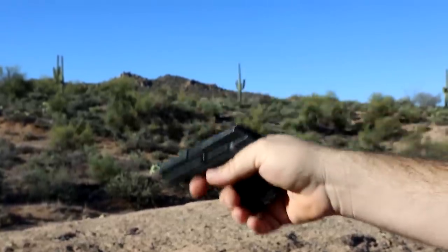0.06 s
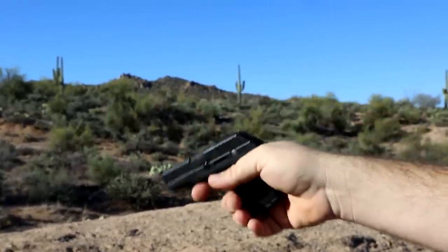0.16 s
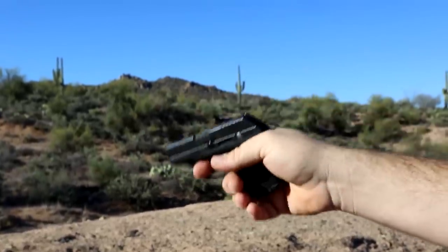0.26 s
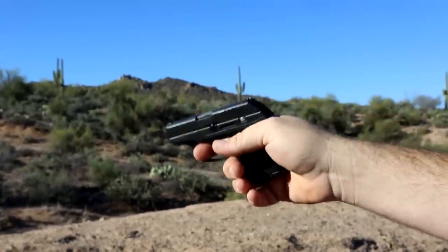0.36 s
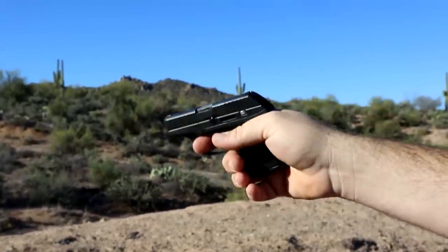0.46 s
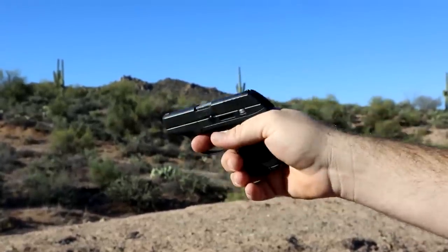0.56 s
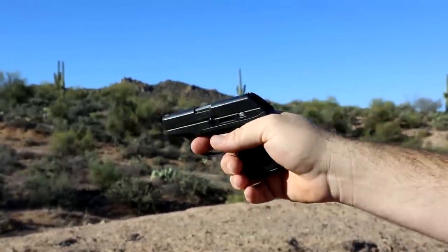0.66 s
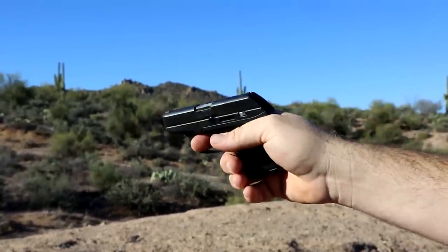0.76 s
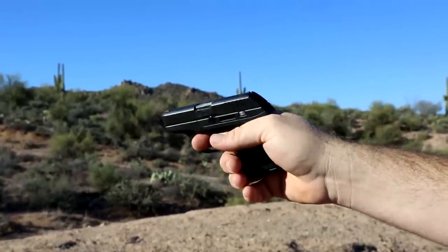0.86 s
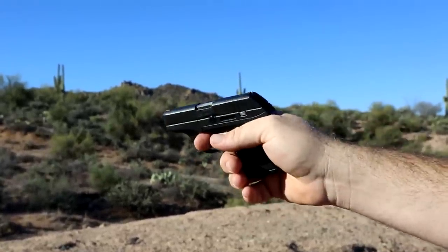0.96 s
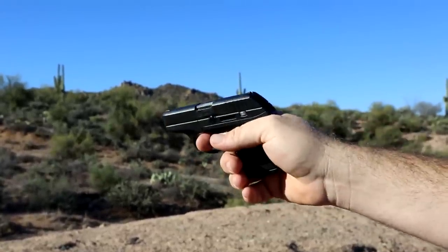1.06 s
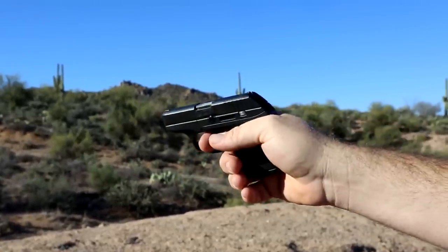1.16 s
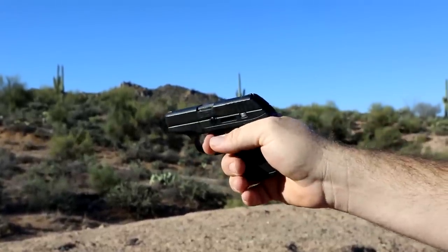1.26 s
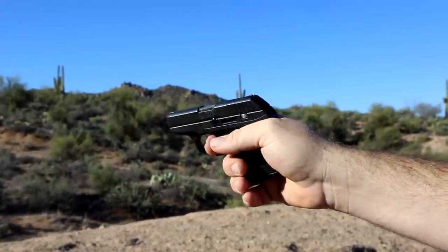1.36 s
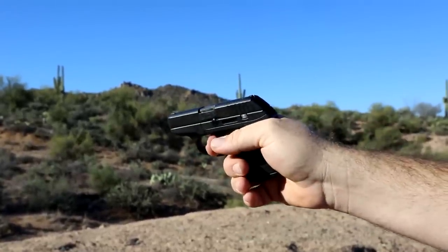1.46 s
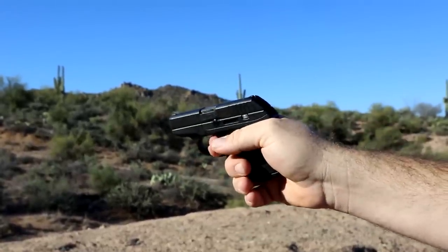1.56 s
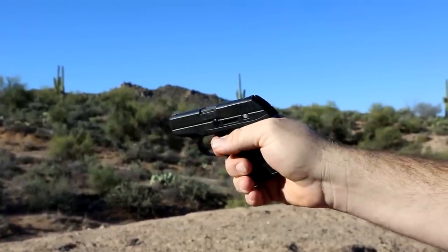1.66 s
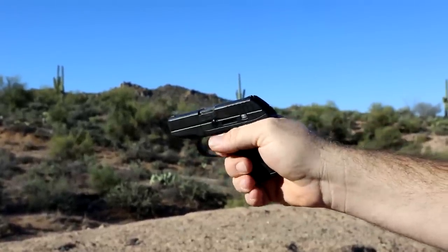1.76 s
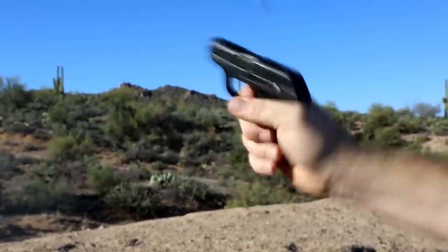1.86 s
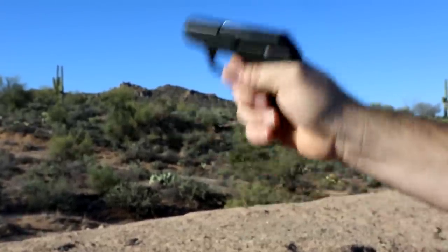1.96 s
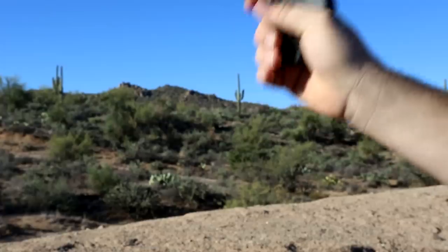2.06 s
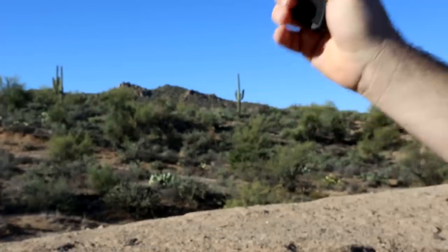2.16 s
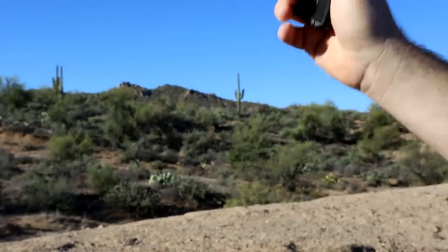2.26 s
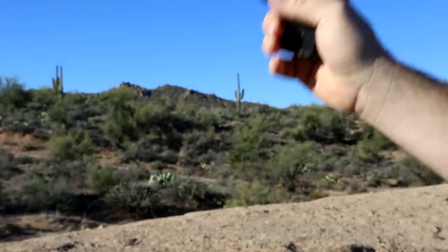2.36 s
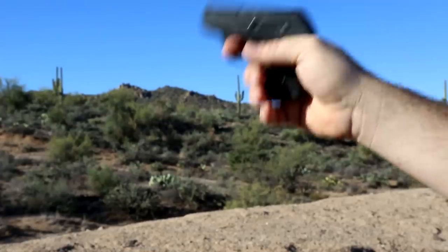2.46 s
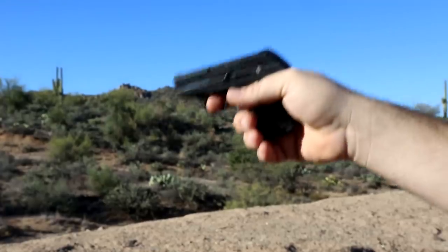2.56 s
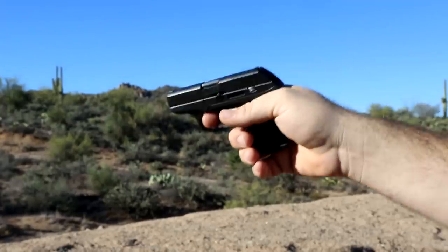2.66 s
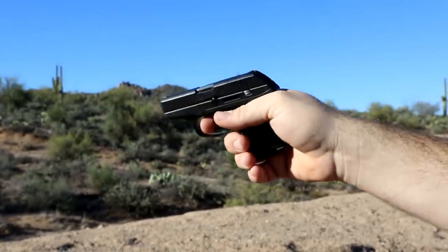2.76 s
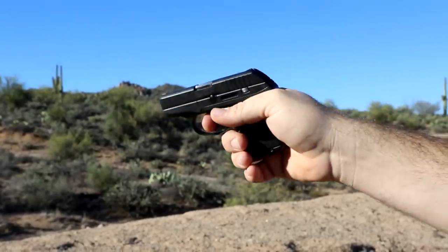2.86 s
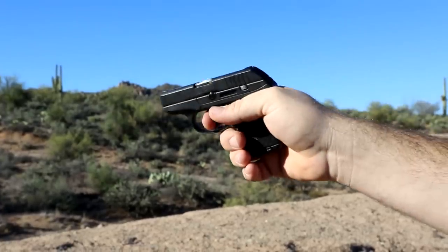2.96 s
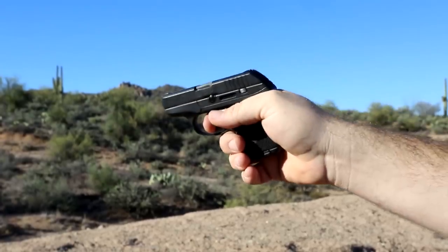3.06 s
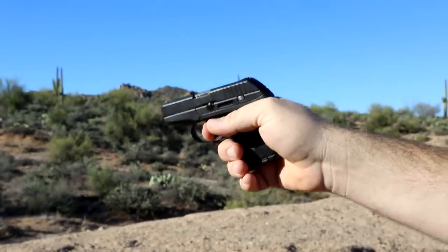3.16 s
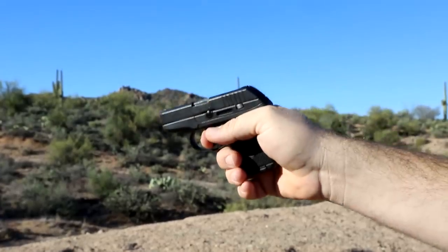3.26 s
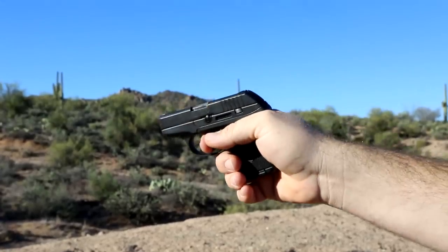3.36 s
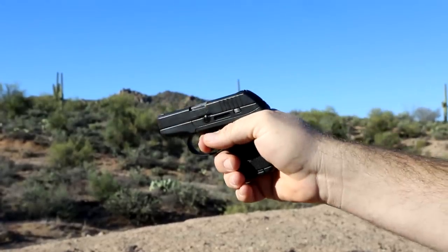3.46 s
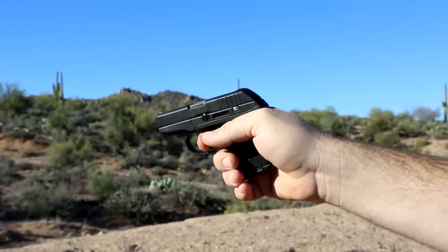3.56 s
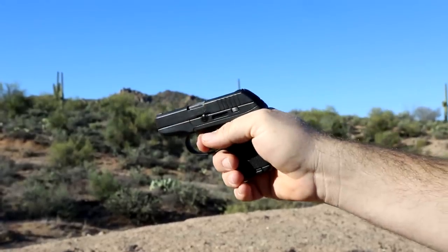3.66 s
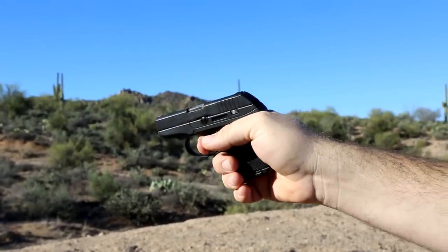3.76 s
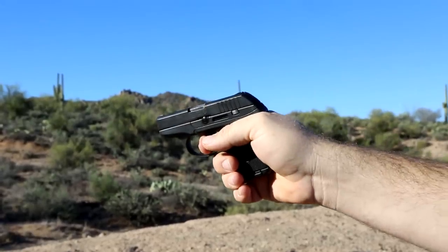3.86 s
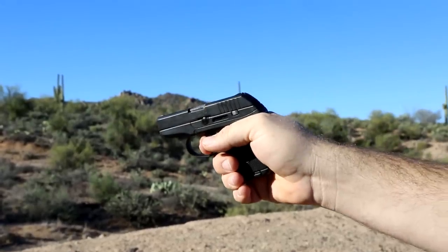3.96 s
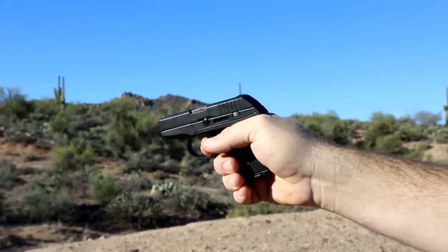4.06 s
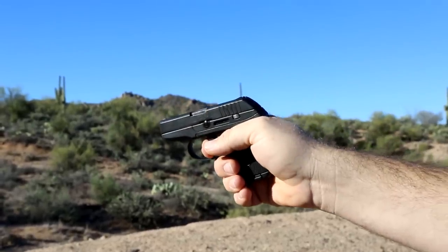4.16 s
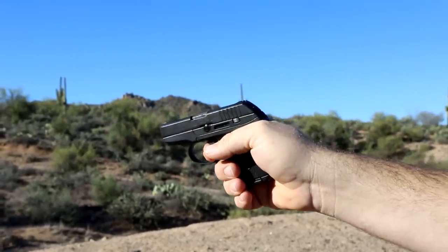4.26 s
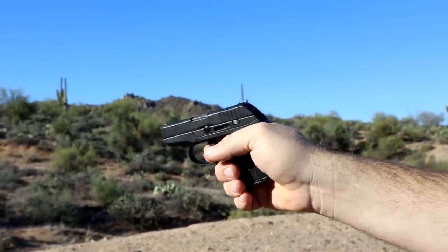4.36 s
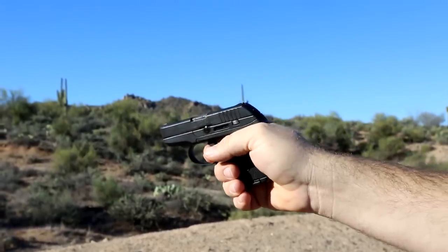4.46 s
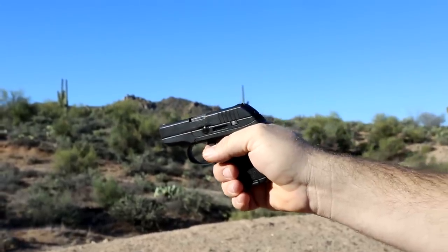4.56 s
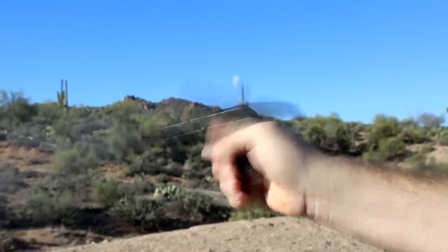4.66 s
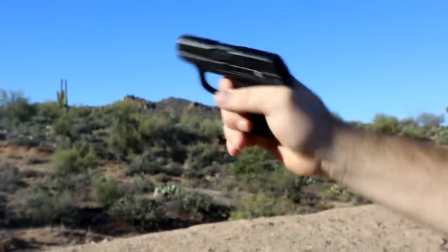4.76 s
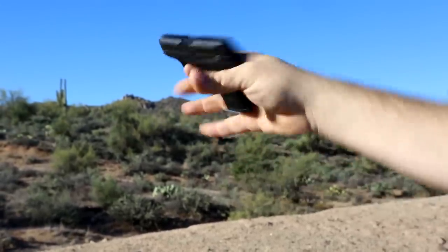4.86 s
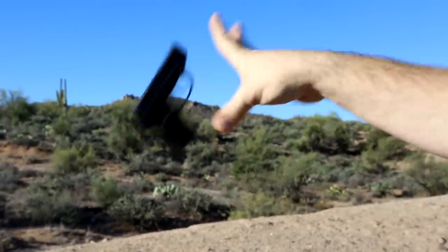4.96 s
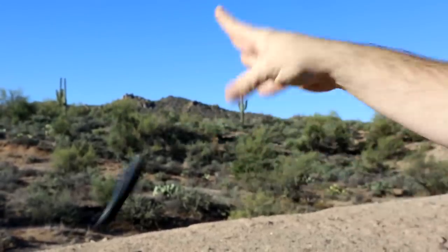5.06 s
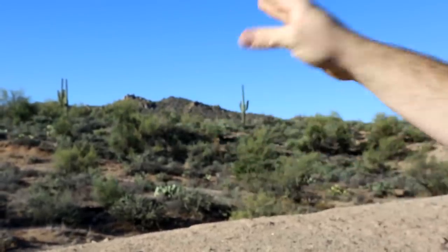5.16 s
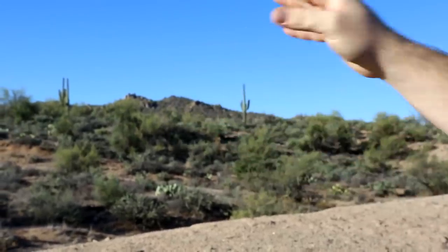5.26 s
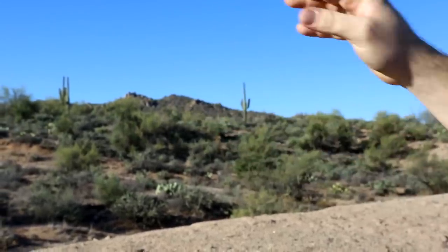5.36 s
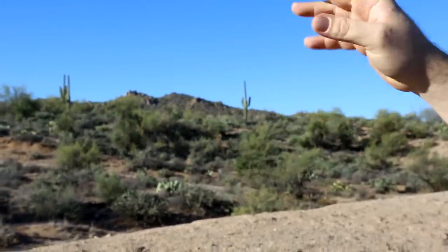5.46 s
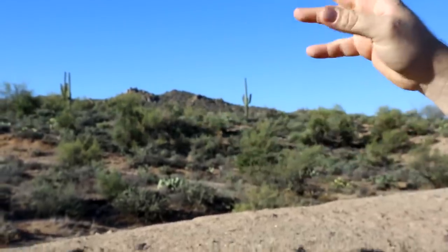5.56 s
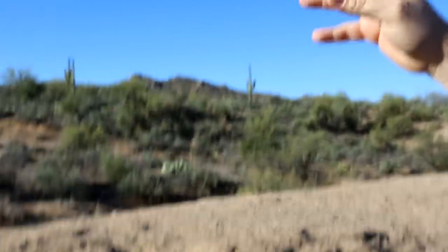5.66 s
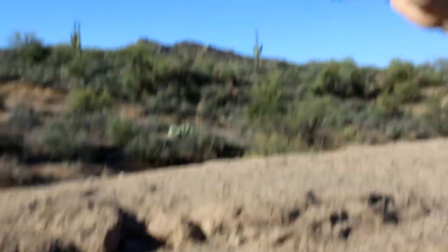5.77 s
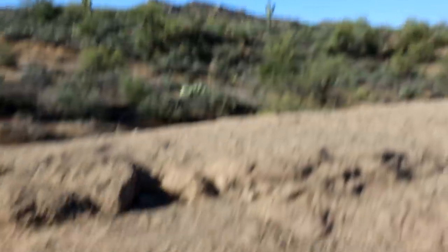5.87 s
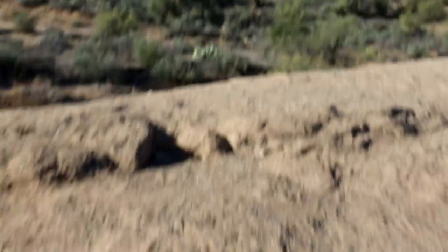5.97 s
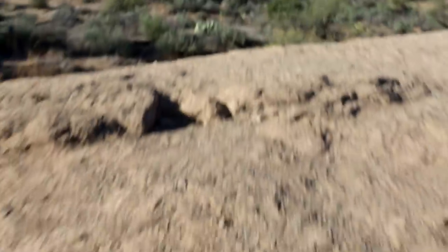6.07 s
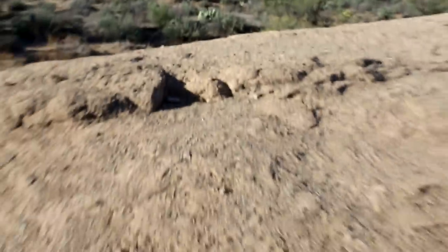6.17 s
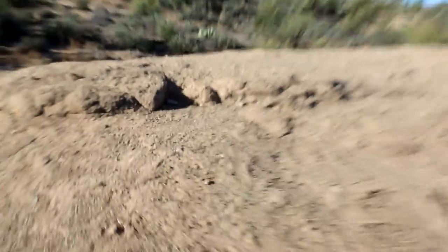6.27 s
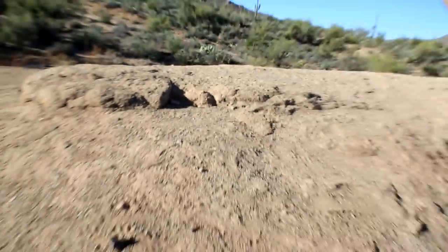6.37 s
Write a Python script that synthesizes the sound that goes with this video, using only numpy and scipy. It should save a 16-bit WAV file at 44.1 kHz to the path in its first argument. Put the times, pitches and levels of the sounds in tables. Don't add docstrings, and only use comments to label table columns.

```python
import sys
import numpy as np
from scipy import signal
from scipy.fft import rfft, irfft, next_fast_len
from scipy.io import wavfile
from scipy.ndimage import uniform_filter1d, map_coordinates

SR = 44100
rng = np.random.default_rng(int(sys.argv[2]) if len(sys.argv) > 2 else 0)


def to_wav(sig):
    pcm = np.clip(np.atleast_2d(sig), -1, 1) * 32767
    pcm = np.round(pcm).astype(np.int16)
    wavfile.write(sys.argv[1], SR, pcm.T)


def amplitude_ratio(level_db):
    exponent = np.asarray(level_db, float) / 20
    return 10 ** exponent


N = 283298

# bang t/s, dip/dB, hold/s, recovery/(dB/s)
GAIN_DIPS = [
    (-.335, -10, 0.24, 36),
    (1.97, -8, 0.29, 36),
    (4.813, -10.5, 0.294, 41),
    (5.612, -10, 0.054, 24.5),
]
# t/s, rate/(grains/s)
GRAIN_RATE = [(0, 14.4), (.5, 45), (.7, 78), (1.1, 46), (1.9, 31), (4.7, 16.7), (5.65, 25), (5.75, 137),
              (6.42, 110)]


def unit(x):
    return x / np.sqrt(np.mean(x ** 2) + 1e-20)


def noise(n=N):
    return rng.standard_normal(n)


def curves(rows, start_s=0):
    s, *columns = np.transpose(rows)
    return [np.interp(np.arange(N) / SR + start_s, s, c, left=-120) for c in columns]


def coloured(x, spectrum, band_hz=(0, 30000)):
    m = next_fast_len(len(x) + 8192)
    hz = np.fft.rfftfreq(m, 1 / SR) + 1
    f, db = np.transpose(spectrum)
    shape = amplitude_ratio(np.interp(np.log(hz), np.log(f), db))
    edges = 1 / np.sqrt((1 + (band_hz[0] / hz) ** 12) * (1 + (hz / band_hz[1]) ** 12))
    return unit(irfft(rfft(x, m) * shape * edges, m)[:len(x)])


def wobble(rate_hz):
    knots = noise(int(N * rate_hz / SR) + 4)
    return map_coordinates(knots, [np.arange(N) * rate_hz / SR])


def swell(centre_s, width_s):
    return np.exp(-.5 * ((np.arange(N) / SR - centre_s) / width_s) ** 2)


def add(track, s, sound):
    k = round(s * SR)
    part = track[max(k, 0):][:max(len(sound) + min(k, 0), 0)]
    part += sound[max(-k, 0):][:len(part)]


def filtered(x, order, hz, kind="lowpass"):
    return signal.sosfilt(signal.butter(order, hz, kind, fs=SR, output="sos"), x)


def puff(hz, width_ratio, t60_s, attack_s, push=0.85):
    t = np.arange(SR // 10) / SR
    burst = noise(len(t)) * amplitude_ratio(-60 * t / t60_s) * (1 - np.exp(-t / attack_s))
    burst[round(attack_s * SR)] = -push * np.sqrt(t60_s * SR / 14)
    burst = filtered(burst, 2, [hz / width_ratio, hz * width_ratio], "bandpass")
    return burst / np.abs(burst).max()


def thump(hz, t60_s, rise_s, bend=1):
    t = np.arange(SR // 10) / SR
    envelope = amplitude_ratio(-60 * (t / t60_s) ** bend) * (1 - np.exp(-t / rise_s))
    return envelope * np.sin(2 * np.pi * hz * t)


def ducking(rows):
    settle_db, settle_s = -5, 1.2
    t = np.arange(N) / SR
    dips_db = []
    for s, db, hold_s, db_per_s in rows:
        climb_db = np.clip(db + db_per_s * (t - s - hold_s), db, 0)
        settling_db = settle_db * np.clip(1 - (t - s) / settle_s, 0, 1)
        dips_db.append(np.where(t > s, climb_db + settling_db, 0))
    return amplitude_ratio(uniform_filter1d(np.min(dips_db, 0), size=400, origin=199))


def ground_boom():
    # f/Hz, level/dB
    boom_spectrum = [(30, -59.5), (70, -23), (130, -9), (330, -6), (800, -1.5), (1250, -2), (1420, 0.5),
                     (1600, -3), (2600, -7), (3900, -10), (8000, -23.5), (15700, -22.5)]
    bounce_s, bounce_db = .0066, -5
    dull_s, dull_hz, dull_db = 0.042, 1500, 2.5
    boom = coloured(noise(round(.11 * SR)), boom_spectrum)
    boom = unit(boom + amplitude_ratio(bounce_db) * np.roll(boom, round(bounce_s * SR)))
    dull = amplitude_ratio(dull_db) * filtered(boom, 1, dull_hz)
    late = .5 + .5 * np.tanh((np.arange(len(boom)) / SR - dull_s) / .004)
    return (1 - late) * boom + late * dull


def blast(boom):
    # t after firing/s, ceiling/dB, overdrive/dB
    overload = [(0, -25, 5.5), (.0005, -2, 13.5), (.002, -5.5, 2.5), (.0026, 6.5, 11.5), (.0042, 0.5, 17.5),
                (.0055, -8, 2), (.016, -7.5, 0.5), (.019, -13, -5.5), (.023, -8, -1.5), (.045, -25.5, -6)]
    # f/Hz, level/dB
    crack_spectrum = [(300, -40), (1500, -18.5), (3600, -6.5), (5800, 2), (7000, -3), (10700, 2),
                      (13100, -11), (15700, -3)]
    fall_db_per_s = 330.5
    crack_s, crack_share = 0.0037, 0.84
    sizzle_s, sizzle_share = 0.048, .18
    n = len(boom)
    t = np.arange(n) / SR
    ceiling_db, drive_db = [c[:n] for c in curves(overload)]
    ceiling_db = ceiling_db - fall_db_per_s * np.clip(t - overload[-1][0], 0, None)
    bright = crack_share / (1 + (t / crack_s) ** 8) + sizzle_share * np.exp(-t / sizzle_s) + 0.056
    bright = np.clip(bright, 0, 1)
    crack = coloured(noise(n), crack_spectrum)
    raw = amplitude_ratio(drive_db) * (np.sqrt(bright) * crack + np.sqrt(1 - bright) * boom)
    squared = raw / (1 + np.abs(raw) ** 4) ** (1 / 4)
    fade = np.clip((n - np.arange(n)) / 400, 0, 1) * np.clip(np.arange(n) / 20, 0, 1)
    return fade * amplitude_ratio(ceiling_db) * squared


def far(x):
    air_db_per_s, air_power, near_s = 0.6526, 2.04, 0.2
    shadow_s, shadow_edge_s, shadow_hz, shadow_db = 0.89, 0.19, 1560, 14.5
    patch_db = 1.54
    hz, t, z = signal.stft(x, SR, nperseg=256)
    air_db = air_db_per_s * np.outer((hz / 1000) ** air_power, t - near_s)
    shaded_hz = 1 / (1 + (shadow_hz / (hz + 1)) ** 6)
    behind_ridge = .5 + .5 * np.tanh((t - shadow_s) / shadow_edge_s)
    shade_db = shadow_db * np.outer(shaded_hz, behind_ridge)
    patches = uniform_filter1d(noise(z.shape), size=5, axis=0)
    patches = unit(uniform_filter1d(patches, size=4, axis=1))
    return signal.istft(z * amplitude_ratio(patch_db * patches - air_db - shade_db), SR, nperseg=256)[1][:len(x)]


def rock_slap(hz, bright_db, t60_s):
    rise_s = 0.00126
    # f/Hz, level/dB
    bright_bands = [(2080, -0.5), (3250, -12), (4400, -19)]
    bright = 0
    for band_hz, band_db in bright_bands:
        bright = bright + amplitude_ratio(band_db) * puff(band_hz, 1.186, 0.81 * t60_s, .0015, push=0.51)
    low = thump(hz, 0.55 * t60_s, rise_s, bend=1.93)
    low = low + amplitude_ratio(-9.5) * thump(1.55 * hz, 0.4 * t60_s, rise_s, bend=1.76)
    return low / np.abs(low).max() + amplitude_ratio(bright_db) * bright


def land():
    second_shot_s = 1.9686
    # t/s, level/dB
    slopes = [(2.0, -33), (2.05, -40), (2.077, -43.5), (2.081, -34.5), (2.11, -34.5), (2.155, -33),
              (2.17, -38.5), (2.22, -39), (2.26, -35.5), (2.33, -35.5), (2.4, -34), (2.5, -31), (2.6, -33),
              (2.66, -35.5), (2.8, -40)]
    # f/Hz, level/dB
    near_spectrum = [(80, -23), (250, -9.5), (520, -4), (880, 2), (1250, -1), (1650, -9.5), (2250, -5),
                     (2850, -12.5), (3450, -13), (4050, -17.5), (4700, -14.5), (6300, -22.5), (9000, -27),
                     (16000, -48)]
    # f/Hz, level/dB
    far_spectrum = [(80, -21), (250, -10.5), (520, -4), (880, 1.5), (1200, -0.5), (1550, -8.5), (2080, -1),
                    (2650, -11), (3200, -7), (3800, -15), (4400, -11.5), (5200, -18.5), (9000, -30.5),
                    (16000, -49)]
    # t/s, peak/dB, f/Hz, bright part/dB, t60/s
    rocks = [(2.041, -28, 1091, -19, 0.034), (2.079, -40, 1006, -10.5, 0.021),
             (2.131, -24.5, 713, -2, 0.027), (2.2425, -26, 843, 3.5, 0.023), (2.277, -36, 900, -7, 0.011),
             (2.4285, -33, 820, 7, 0.024), (2.312, -28.5, 884, -16, 0.043), (2.473, -38, 980, 2, 0.024),
             (2.4875, -19, 612, -4, 0.031), (2.502, -32, 820, -16.5, .02), (2.516, -16, 681, -20, 0.031),
             (2.554, -30, 1030, -10, 0.022), (2.561, -22.5, 760, -22, 0.015), (2.599, -30, 820, -7, 0.074),
             (2.6072, -14, 665, -9, 0.014), (2.689, -34, 690, 3, .02), (2.7627, -17, 967, -4.5, 0.017),
             (2.836, -31, 930, -16.5, 0.013), (2.8735, -29.5, 830, -7, 0.057), (2.95, -40, 660, -11, 0.041),
             (3.029, -24, 906, -22, 0.012), (3.0326, -26.5, 1070, -11, 0.017)]
    fall_db_per_s = 14.5
    turn_s, turn_width_s = 0.7, 0.11
    t = np.arange(N) / SR
    clumps = amplitude_ratio(0.6 * wobble(50.04) + 1.3 * wobble(200) + 1.8 * wobble(900)) * noise()
    turn = .5 + .5 * np.tanh((t - turn_s) / turn_width_s)
    near_wash = coloured(clumps, near_spectrum, band_hz=(70, 30000))
    far_wash = coloured(clumps, far_spectrum, band_hz=(70, 30000))
    wash = (1 - turn) * near_wash + turn * far_wash
    late_s = np.clip(t + second_shot_s - slopes[-1][0], 0, None)
    answer = amplitude_ratio(curves(slopes, second_shot_s)[0] - fall_db_per_s * late_s) * far(wash)
    for s, db, hz, bright_db, t60_s in rocks:
        add(answer, s - second_shot_s, amplitude_ratio(db - 1.5) * rock_slap(hz, bright_db, t60_s))
    return answer[:3 * SR]


def shots():
    shot_times = [
        -.3351,
        1.9686,
        4.8118,
    ]
    boom, answer = ground_boom(), land()
    bangs, echoes = np.zeros(N), np.zeros(N)
    for s in shot_times:
        add(bangs, s, blast(boom))
        add(echoes, s, answer)
    bangs = filtered(bangs, 2, 180, "highpass")
    return bangs + echoes * ducking(GAIN_DIPS[-1:])


def dropped_pistol():
    # t/s, peak/dB, thud/dB, t60/s, ring/dB
    hits = [
        (5.6056, -2.5, -23.5, 0.014, -37),
        (5.605, -13, -23.5, 0.019, -36),
        (5.6083, 4, -25.5, 0.012, -44),
        (5.62, -24, -33, .02, -30),
        (5.6222, -13, -41, 0.02, -21),
        (5.6271, -11.5, -40, 0.017, -16.5),
    ]
    # f/Hz, level/dB, t60/s
    steel = [(3219, -2, 0.044), (3240, -11, 0.02), (5250, -1, 0.029), (8640, -20.5, 0.039),
             (10500, -8.5, 0.033)]
    # f/Hz, level/dB
    gravel_spectrum = [(590, -40), (1000, -9.5), (1800, -2.5), (3020, -0.5), (3670, -7.5), (5310, 3.5),
                       (12700, 4.5), (15700, -12)]
    out, t = np.zeros(N), np.arange(SR // 5) / SR
    for s, db, thud_db, t60_s, ring_db in hits:
        grains = noise(len(t))
        crunch = coloured(grains * np.sqrt(np.abs(grains)), gravel_spectrum)
        crunch = crunch * (amplitude_ratio(-60 * t / t60_s) + amplitude_ratio(-30.0 - 60 * t / 0.158))
        ring = np.zeros(len(t))
        for hz, level_db, life_s in steel:
            ring += amplitude_ratio(level_db + rng.normal(0, 1.5) - 60 * t / life_s) * np.sin(2 * np.pi * hz * t)
        add(out, s, amplitude_ratio(db) * (amplitude_ratio(-6.0) * crunch + amplitude_ratio(ring_db) * ring))
        add(out, s, amplitude_ratio(db + thud_db) * puff(220, 1.5, 0.0064, 0.001))
    return out


def click(db, hz, body_db):
    tick = .6 * puff(hz, 1.35, .011, .0003, push=.7) + .38 * puff(8500, 1.8, .004, .0001)
    body = amplitude_ratio(body_db - 2.5) * puff(3300, 1.8, 0.0094, .0001)
    return amplitude_ratio(db + 1.5) * (tick + body)


def pebbles():
    # t/s, peak/dB, f/Hz, body/dB
    stones = [(5.5648, -38, 3500, 0), (5.587, -42, 9000, -17), (5.708, -46, 11000, -19.5),
              (5.7255, -50, 5000, -10), (5.821, -42, 11000, -20), (6.015, -45, 7800, -15),
              (6.027, -45.5, 12500, -20), (6.103, -41, 10000, -15), (6.346, -31.5, 12000, -19),
              (5.7157, -36, 11400, -21), (5.7755, -33, 7000, 1), (5.7913, -37, 5180, -18),
              (5.7986, -27.5, 6730, -16), (5.8277, -27.5, 9680, -23), (5.8584, -41.5, 4520, -14),
              (5.8825, -47, 4800, -13), (5.8984, -47, 4770, -11), (5.9217, -34, 4720, -16),
              (5.9275, -37, 5530, -7.5), (5.9745, -30.5, 10600, -17.5), (6.0194, -43, 4630, -15),
              (6.0472, -43, 5840, -12), (6.0871, -35.5, 9040, 1.5), (6.1172, -16.5, 11700, -11),
              (6.205, -23, 5430, -9), (6.2605, -18.5, 6040, 2.5), (6.2783, -27.5, 6000, 6),
              (6.2941, -31.5, 11900, -8)]
    out = np.zeros(N)
    for s, db, hz, body_db in stones:
        add(out, s, click(db, hz, body_db))
    return out


def handling():
    # t/s, peak/dB, f/Hz
    hand_ticks = [(0.556, -37, 6810), (0.5623, -32, 9120), (0.5786, -35, 6600), (0.593, -28.5, 9460),
                  (0.63, -38, 5240), (0.6527, -35, 10800), (0.7151, -27, 7900), (0.857, -33.5, 9000),
                  (0.8777, -25, 10000), (0.8787, -30, 5750), (0.9138, -32.5, 7000), (.6739, -39, 9000),
                  (.7806, -41, 10500), (.796, -36, 10000), (.83, -42, 5500), (.905, -36, 12000),
                  (.953, -41, 10500), (1.0625, -40, 6400), (1.3339, -39, 6680), (1.5055, -39, 5900),
                  (1.5429, -41, 11100), (1.699, -39.5, 5260), (1.0788, -38, 5970), (1.1074, -40, 5070),
                  (1.156, -38, 6760), (1.2, -33, 4250), (1.2267, -31, 8000), (1.285, -31.5, 11700),
                  (1.293, -34, 6780), (1.589, -32, 9950), (1.612, -40, 6060), (1.7672, -32, 5170),
                  (2.1796, -25.5, 9000), (2.1815, -31.5, 10500), (2.2096, -23.5, 9500), (2.562, -43, 7500),
                  (3.2681, -41.5, 6590), (3.609, -42, 5600), (2.8586, -38, 5140), (3.009, -33.5, 8640),
                  (3.145, -28.5, 8000), (3.387, -41.5, 3690), (3.9527, -36.5, 6510), (4.1592, -31, 5230),
                  (4.2406, -32, 7160), (4.2954, -36.5, 6730), (4.4458, -42, 6020), (4.9891, -28, 3510)]
    # t/s, level/dB, f/Hz, t60/s, push 1 or pull -1
    knocks = [(.8779, -26.5, 890, 0.0047, 1), (0.8805, -26, 450, 0.0066, 1), (1.2286, -21, 322, 0.015, -1),
              (1.228, -31, 144, .06, -1), (1.2342, -23, 504, 0.016, -1), (3.0094, -19.5, 515, 0.0034, -1),
              (3.0093, -30, 200, 0.025, 1), (3.1454, -22.5, 644, 0.0077, 1), (3.1477, -24.5, 293, 0.016, 1),
              (3.8648, -19.5, 900, 0.0025, 1), (3.8676, -25.5, 280, 0.01, -1),
              (4.1606, -22.5, 437, 0.0085, 1), (4.814, -25, 110, 0.066, 1), (6.1179, -14, 1170, 0.0023, 1),
              (6.1192, -27.5, 240, 0.031, 1), (6.2608, -12, 2000, 0.0037, -1), (6.2635, -27, 2300, .01, 1),
              (6.2787, -19.5, 1500, 0.0095, -1), (6.279, -33, 260, 0.013, 1), (6.2955, -35, 1000, .015, 1),
              (6.3465, -26.5, 224, 0.061, 1), (1.2295, -41, 1300, .05, 1), (1.242, -46, 1630, 0.055, 1),
              (3.8662, -34.5, 1500, 0.011, 1), (6.2606, -21, 3680, 0.0038, -1),
              (4.16, -34, 2940, 0.0023, 1), (3.1459, -29.5, 2210, .004, 1)]
    body_db, body_db_per_octave = -7.5, -5
    out = np.zeros(N)
    for s, db, hz in hand_ticks:
        add(out, s, click(db, hz, body_db + body_db_per_octave * np.log2(hz / 6000)))
    for s, db, hz, t60_s, way in knocks:
        add(out, s, amplitude_ratio(db + 1.5) * way * thump(hz, t60_s, .00005))
    return out


def scrapes():
    # t/s, length/s, rms/dB, centre f/Hz
    scrape_rows = [(1.962, 0.0055, -52.5, 10000), (3.012, .014, -50.5, 6000), (3.144, 0.0067, -41, 4500),
                   (3.152, 0.015, -54, 5000), (3.263, .016, -57, 6000), (4.777, 0.0062, -50.5, 3500),
                   (4.803, .008, -44.5, 6000), (4.984, .025, -43, 5020), (5.765, 0.0062, -46.5, 6000),
                   (5.772, 0.0095, -42, 8000), (5.784, 0.026, -53.5, 6000), (5.829, 0.005, -30.5, 7000),
                   (5.834, .014, -37.5, 7000), (5.922, 0.0079, -46.5, 5500), (5.971, .009, -45.5, 9000),
                   (6.089, 0.023, -48, 5000)]
    out = np.zeros(N)
    for s, length_s, db, hz in scrape_rows:
        u = np.arange(round(length_s * SR)) / (length_s * SR)
        spectrum = [(300, -30), (0.051 * hz, -6), (hz, 0), (13000, -4), (16000, -12)]
        spikes = coloured(noise(len(u)) ** 3, spectrum)
        add(out, s, amplitude_ratio(db) * np.sqrt(np.sin(np.pi * u ** 0.7)) * spikes)
    return out


def loose_grains():
    grain_db, db_per_doubling = -47.5, 2.5
    out, t = np.zeros(N), np.arange(200) / SR
    rate, = curves(GRAIN_RATE)
    size = amplitude_ratio(grain_db + db_per_doubling * np.log2(rate / 30)) * ducking(GAIN_DIPS[-1:])
    draw = rng.random((600, 3))
    passed = np.cumsum(rate) / SR
    due = np.cumsum(-np.log(1 - draw[:, 0]))
    starts = np.searchsorted(passed, due[due < passed[-1]])
    for k, (_, pitch, luck) in zip(starts, draw):
        hz = 5500 * 2.4 ** pitch
        ping = np.exp(-t * hz / 1.2) * np.sin(2 * np.pi * hz * t)
        add(out, k / SR, size[k] * amplitude_ratio(-3 * np.log(1 - .93 * luck)) * ping)
    return out


def brass():
    # t/s, f/Hz, level/dB, t60/s
    pings = [(3.15, 11970, -63, .3), (3.63, 12100, -57, .35), (3.9, 12150, -66, .3),
             (5.5, 11700, -48, 0.33), (6.118, 11860, -54, .3), (6.208, 11700, -48, 0.2),
             (2.01, 12360, -56, .25), (6.265, 11850, -52, .3)]
    out, t = np.zeros(N), np.arange(SR // 3) / SR
    for s, hz, db, t60_s in pings:
        drift = .04 * np.cumsum(noise(len(t)))
        add(out, s, amplitude_ratio(db - 60 * t / t60_s) * np.sin(2 * np.pi * hz * t + drift))
    return out * amplitude_ratio(1.8 * wobble(60))


def rustle():
    # t/s, cloth/dB
    cloth_level = [(5.7, -63), (5.9, -55.5), (6.1, -55.5), (6.2, -45), (6.3, -41.5), (6.42, -32.5)]
    # f/Hz, level/dB
    cloth_spectrum = [(240, -38), (400, -2), (578, -11.5), (654, -3), (1080, -9.5), (1340, -5.5),
                      (8350, -17.5), (15700, -20)]
    bump_spectrum = [(60, -35), (200, -5.0), (500, -20.0), (900, -59.5)]
    bump_rel_db, jolt_s, jolt_db, jolt_width_s = -8.5, 6.357, 10, 0.0147
    cloth_db, = curves(cloth_level)
    bump_db = cloth_db + bump_rel_db + jolt_db * swell(jolt_s, jolt_width_s)
    cloth = coloured(amplitude_ratio(1.3 * wobble(300)) * noise(), cloth_spectrum)
    bump = coloured(amplitude_ratio(3.5 * wobble(40)) * noise(), bump_spectrum)
    return amplitude_ratio(cloth_db - 0.5) * cloth + amplitude_ratio(bump_db + 1.5) * bump


def far_road():
    # f/Hz, level/dB
    road_spectrum = [(88, -33.5), (150, -2.5), (199, -3.5), (258, -7.5), (358, -8), (504, -6.5), (709, -2),
                     (1060, -10), (1350, -20), (2500, -32), (3250, -48.5), (5500, -120)]
    road_db, pass_s, pass_db, pass_width_s = -48, 1.95, 2.5, 0.71
    tyre_hz, tyre_db, tyre_s, tyre_swell_db, tyre_width_s = 940, -59.5, 1.0, 1.5, 1.3
    drone_db = road_db + pass_db * swell(pass_s, pass_width_s) + 0.68 * wobble(6) + .8 * wobble(25)
    whoosh_db = tyre_db + tyre_swell_db * swell(tyre_s, tyre_width_s) + .8 * wobble(5.4)
    drone = amplitude_ratio(drone_db) * coloured(noise(), road_spectrum, band_hz=(0, tyre_hz))
    whoosh = amplitude_ratio(whoosh_db) * coloured(noise(), road_spectrum, band_hz=(tyre_hz, 30000))
    return drone + whoosh


def breeze():
    # t/s, level/dB
    gusts = [(0, -52.5), (.6, -52), (1.2, -48), (2.4, -53), (2.65, -46.5), (3.1, -48.5), (3.7, -51),
             (5.5, -49), (5.8, -43.5), (6.05, -51), (6.42, -52)]
    # f/Hz, level/dB
    breeze_spectrum = [(12, -44.5), (20, -12.5), (64, -8), (103, -2.5), (119, -1), (160, -18), (210, -43.5),
                       (350, -120)]
    breeze_db = curves(gusts)[0] + .8 * wobble(16) + 0.78 * wobble(4.8)
    return amplitude_ratio(breeze_db) * coloured(noise(), breeze_spectrum)


def input_hiss():
    # f/Hz, level/dB
    hiss_spectrum = [(880, -24.5), (1500, 4.5), (1690, -4), (2090, -2.5), (2380, -3), (11700, -7.5),
                     (15700, -11.5)]
    base_db, rub_db_per_doubling = -58, 1.2
    hiss_db = base_db + rub_db_per_doubling * np.log2(curves(GRAIN_RATE)[0] / 30)
    return amplitude_ratio(hiss_db + 0.36 * wobble(3.0)) * coloured(noise(), hiss_spectrum)


def background():
    gain = ducking(GAIN_DIPS)
    return (far_road() + input_hiss()) * gain + breeze() * gain ** 1.3


def scene():
    pistol = shots() + dropped_pistol()
    small = pebbles() + handling() + scrapes() + loose_grains() + brass() + rustle()
    return (pistol + small + background())[None]


def band_limit(x):
    return signal.sosfilt(signal.butter(12, 15820, fs=SR, output="sos"), x)


def record(dry):
    smooth = filtered(dry, 2, 45, "highpass")
    smooth = filtered(smooth, 4, 15300)
    return band_limit(np.clip(smooth, -1, 1))


dry = scene()
out = record(dry)
to_wav(out)
```